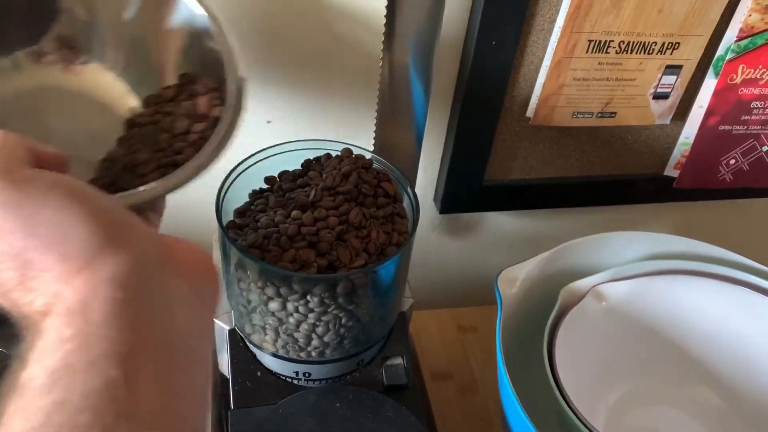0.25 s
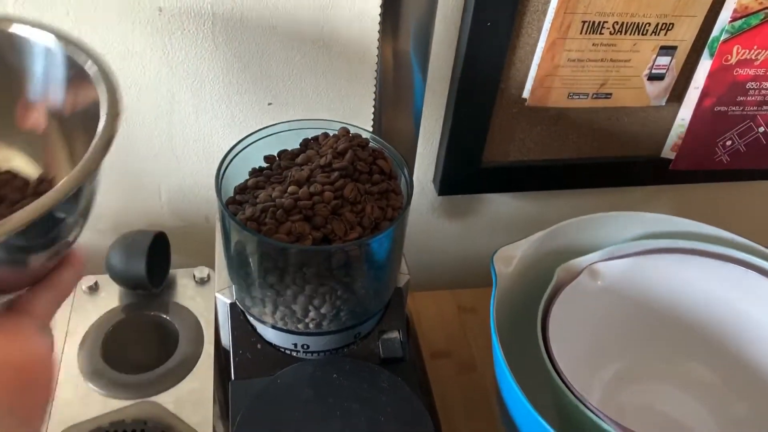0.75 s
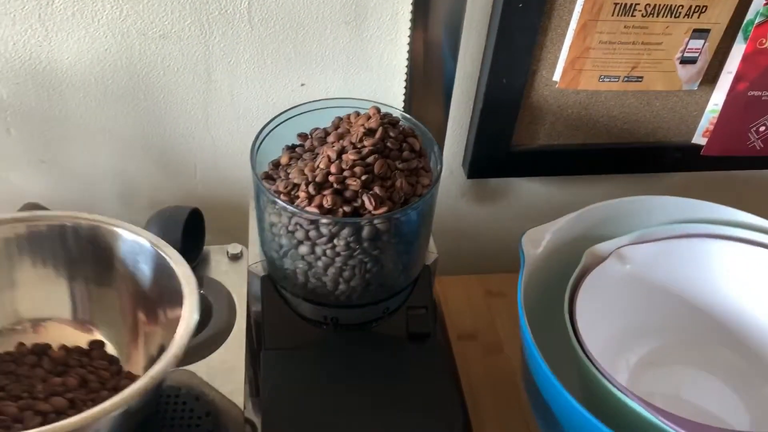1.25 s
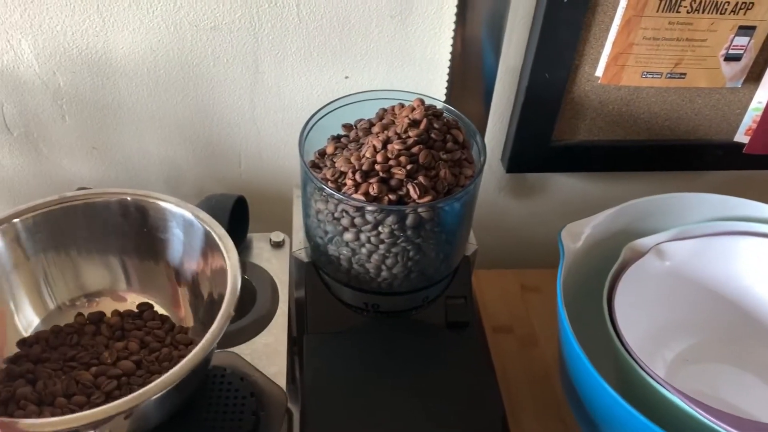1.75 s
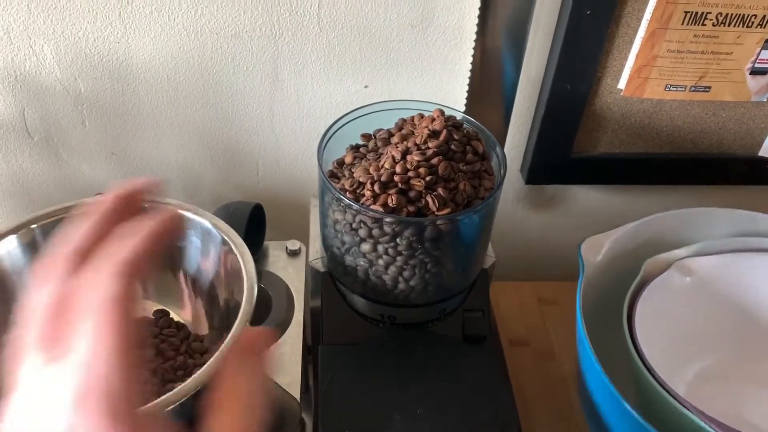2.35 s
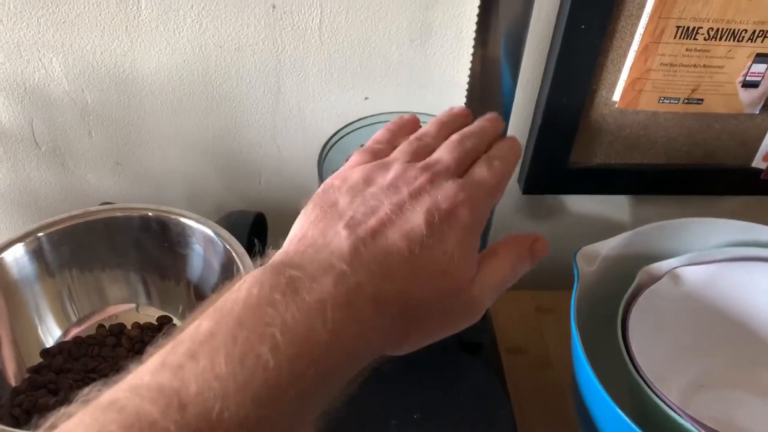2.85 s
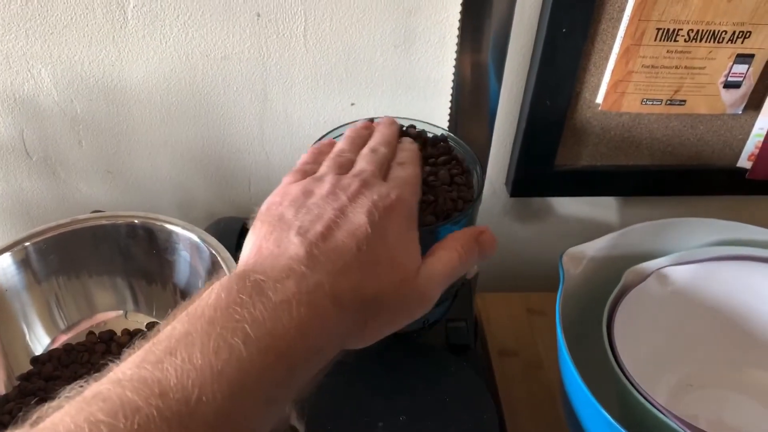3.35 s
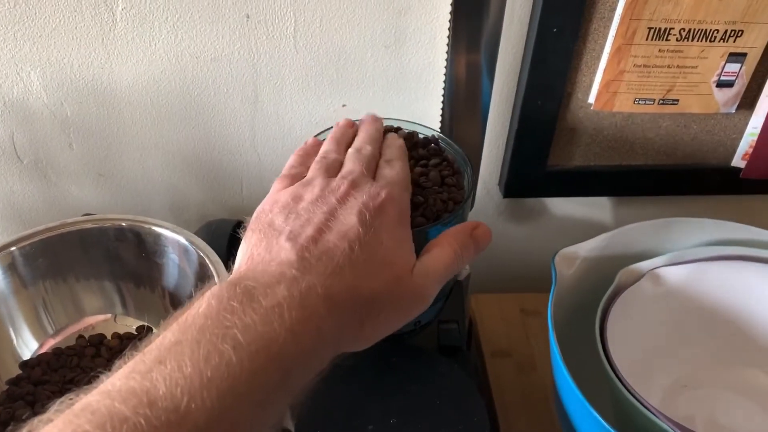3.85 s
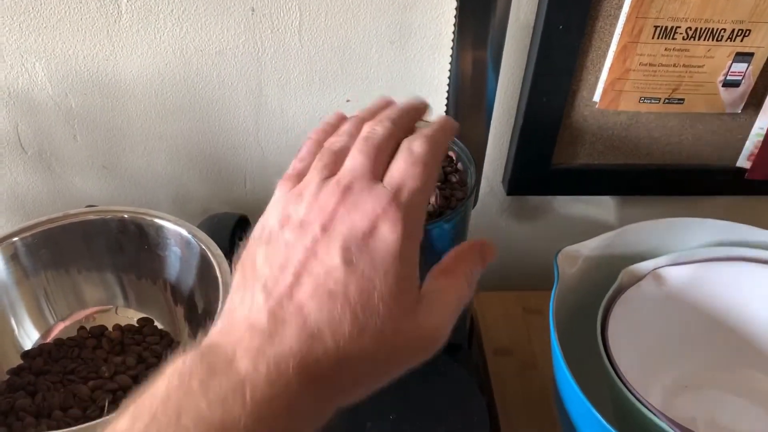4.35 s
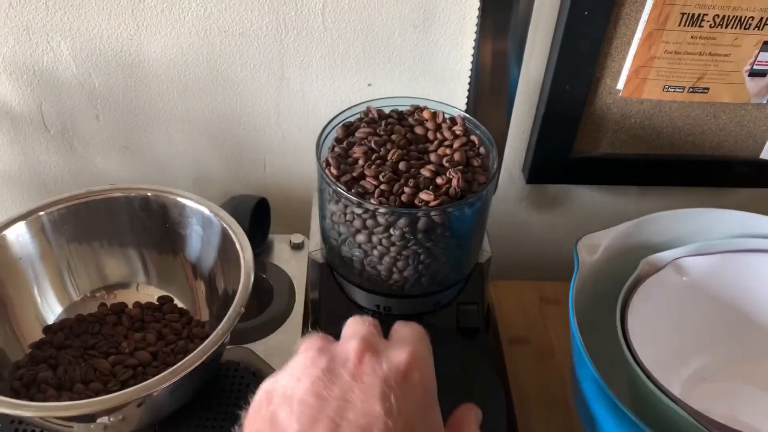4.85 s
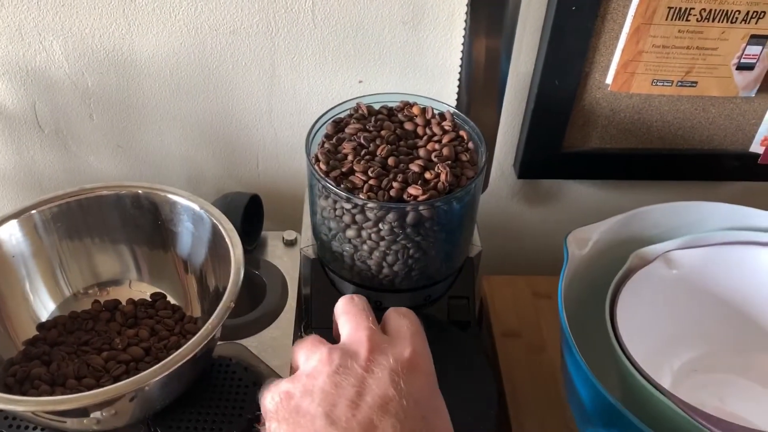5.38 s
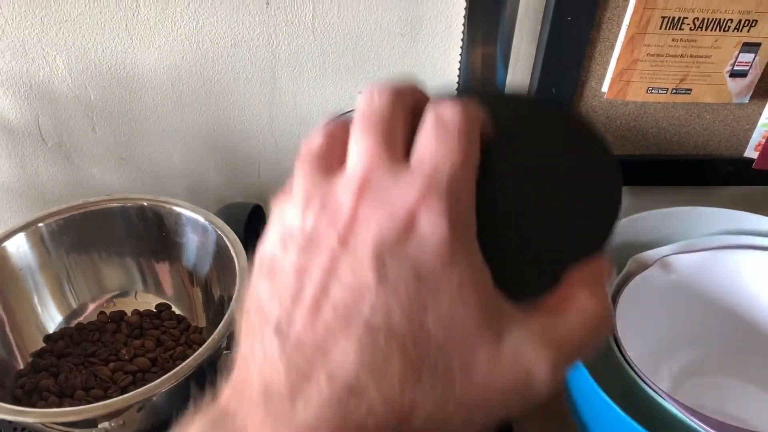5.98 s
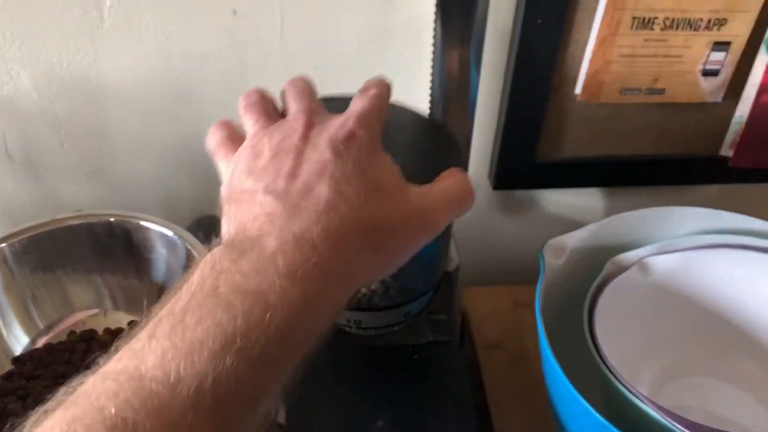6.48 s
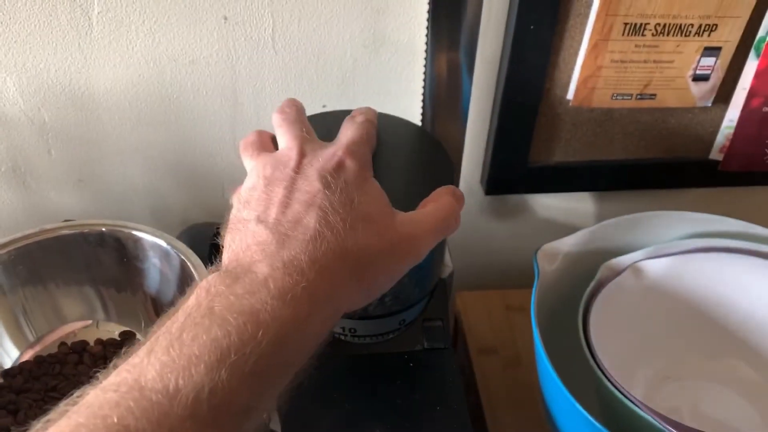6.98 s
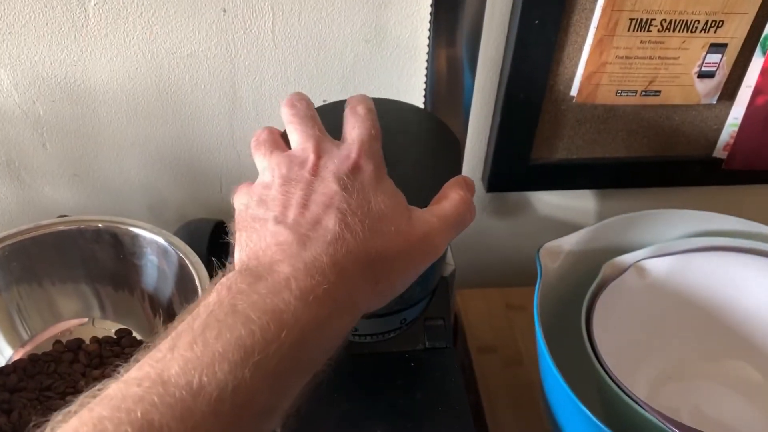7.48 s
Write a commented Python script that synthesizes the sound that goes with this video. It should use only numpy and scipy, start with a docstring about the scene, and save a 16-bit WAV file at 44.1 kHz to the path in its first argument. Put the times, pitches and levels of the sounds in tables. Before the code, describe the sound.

A brief, bright rush of hard coffee beans falls into a grinder hopper, with a faint ring from the steel bowl. The bowl is put down with a muted metallic clunk. Later, beans grind and tick under a hand, then a plastic lid is picked up, catches, clacks and is pressed firmly shut. Soft low thuds recur beneath. Close stereo microphones, short indoor reflections, quiet low room noise.

```python
"""A small kitchen: coffee beans slide from a steel bowl into a plastic grinder hopper, heard close by in stereo.
The beans are showers of tiny noisy contacts; bowl, lid and hopper are struck sets of decaying modes.
The bowl is set down, a hand levels the heap, and the lid is picked up, seated and pressed shut.
Dull thuds, like slow steps elsewhere in the house, come through the floor over a low room noise.
Short reflections surround the counter, and two microphone ports hear it with their own delay and detail."""
import sys
import numpy as np
from scipy import signal
from scipy.fft import rfft, irfft, next_fast_len
from scipy.io import wavfile

SR = 44100
rng = np.random.default_rng(int(sys.argv[2]) if len(sys.argv) > 2 else 0)


def wav_record(signal):
    """Record a signal, one row per channel, as 16-bit PCM in the file named by sys.argv[1]."""
    frames = np.transpose(np.atleast_2d(signal))
    bounded = np.clip(frames, -1, 1)
    # unit amplitude maps onto the largest positive 16-bit level
    quanta = np.round(bounded * 32767).astype(np.int16)
    wavfile.write(sys.argv[1], SR, quanta)


N = 340447
TIME = np.arange(N) / SR

# Levels in the tables are relative: gains, filters and the room still follow.

# Beans sliding over the steel, breaking loose and then running.
# Each row: crest in seconds, level in dB, swell in seconds, fade in seconds.
SLIDE_SURGES = [(.15, -72, .12, .1), (.195, -64.5, 0.02, .06), (.223, -50.5, 0.0087, 0.033),
                (.275, -51.5, .06, .09), (.385, -42.5, 0.11, 0.19)]
# Beans falling on the heap, the end of one tip and then the next.
# Each row: crest in seconds, level in dB, swell in seconds, fade in seconds.
FALL_SURGES = [(.005, -55, .02, .06), (.435, -35, .19, .14)]
# Single beans landing in the hopper. Each row: start in seconds, level in dB, shell pitch in Hz.
BEAN_DROPS = [(0.0064, -37.5, 4440), (0.026, -40, 13900), (0.073, -54, 9950), (0.163, -37.5, 8160),
              (0.217, -33, 3250), (0.2224, -37.5, 10200), (0.2618, -38, 7510), (0.2957, -26.5, 8190),
              (0.3476, -35, 9890), (0.3883, -22, 10100), (0.3945, -22, 3120), (0.408, -23, 13300),
              (0.4154, -23.5, 10000), (0.4377, -25, 10100), (0.4596, -23, 13300), (0.4674, -28, 10100),
              (0.4848, -22, 14000), (0.5015, -31, 10500), (0.5556, -34, 10700), (0.5645, -31, 10600),
              (0.5806, -40, 10800), (0.8895, -55.5, 10100), (0.9698, -46.5, 3460)]
# Spectrum of beans sliding over steel. Each row: frequency in Hz, gain in dB.
SLIDE_SPECTRUM = [(200, -36.5), (550, -27), (800, -11.5), (1250, -13.5), (2000, -9.5), (2700, -13),
                  (3200, 4.5), (3900, -1), (7200, 0.5), (8150, 5.5), (8900, -3), (16000, -7.5)]
# Spectrum of beans falling into the hopper. Each row: frequency in Hz, gain in dB.
FALL_SPECTRUM = [(200, -41), (520, -19.5), (800, -5.5), (1300, -11), (2000, -4.5), (4200, -1.5), (7200, 3),
                 (8200, 7), (9000, -2.5), (10200, 7.5), (12000, 3.5), (13500, 8), (16000, -5.5)]
# The bowl's wall singing under moving beans. Each row: frequency in Hz, level in dB, 60 dB decay in seconds.
BOWL_WALL_MODES = [(700, 1, .1), (831, 3, .11), (1210, 3, .06), (1690, 2, .04), (3100, -8, .035),
                   (3200, -5, .04), (3310, -4, .035), (3615, -5, .05), (4420, -5, .05), (8127, -6, .06),
                   (8220, -7, .05), (10055, 3, .09), (10560, -3, .06), (11230, -4, .06), (13280, -2, .06),
                   (13775, -3, .06)]


def pour(slide_db=7, stream_db=-4, drops_db=3.5, scrape_ring_db=-9, fall_ring_db=-25):
    """Beans slide over the steel and rain on the heap; the bowl's thin wall sings most while they run over it."""
    contacts = grains(SLIDE_SURGES, per_s=650, spread_db=2.2, chatter_t60=.004)
    sliding = amp(slide_db) * colour(contacts, SLIDE_SPECTRUM)
    stream = grains(FALL_SURGES, per_s=300, spread_db=2.5, chatter_t60=.012)
    drops = clicks(BEAN_DROPS, t60=.028, rebound=1.2)
    falling = amp(stream_db) * stream + amp(drops_db) * drops
    wall = ringing(amp(scrape_ring_db) * sliding + amp(fall_ring_db) * falling, BOWL_WALL_MODES)
    return sliding + colour(falling, FALL_SPECTRUM) + wall


# Beans shifting under the hand, then under the lid.
# Each row: crest in seconds, level in dB, swell in seconds, fade in seconds.
STIR_SURGES = [(2.918, -64.5, 0.039, 0.17), (3.225, -54.5, 0.16, 0.22), (3.275, -40.5, 0.048, 0.18),
               (3.525, -67.5, 0.037, 0.046), (3.685, -64, 0.049, 0.046), (3.765, -74, 0.057, 0.11),
               (3.932, -64.5, 0.034, 0.041), (6.71, -57.5, 0.032, 0.2), (6.764, -46.5, 0.028, 0.026),
               (7.315, -63, 0.081, 0.039)]
# Beans snapping past each other in the heap. Each row: start in seconds, level in dB, shell pitch in Hz.
BEAN_SLIPS = [(3.084, -57, 9000), (3.1112, -44, 12200), (3.1482, -36, 9600), (3.222, -50, 13800),
              (3.2605, -35, 9500), (3.2636, -21, 9660), (3.2844, -30, 9420), (3.3255, -25, 14100),
              (3.339, -48, 7100), (3.3812, -34, 5280), (3.4075, -31.5, 10700), (3.510, -52.5, 6000),
              (3.689, -32, 13500), (3.7682, -44, 5310), (3.813, -60, 12500), (3.929, -51, 5530),
              (6.7535, -36, 7100), (6.763, -33, 7900), (7.009, -50.5, 7130), (7.2325, -60, 6180),
              (7.285, -48, 6460), (7.307, -44, 7300), (7.331, -47, 6370)]
# Spectrum of beans moving in the heap. Each row: frequency in Hz, gain in dB.
HEAP_SPECTRUM = [(200, -59), (800, -14), (1500, -8.5), (2700, -10.5), (3900, -1.5), (4800, -1), (5800, 2),
                 (7200, 1), (9500, -2.5), (10500, -1), (12000, -4), (13500, -0.5), (16000, -13)]


def heap(stir_db=-1, slips_db=4.0):
    """Pressed beans grind against each other and now and then slip."""
    beans = grains(STIR_SURGES, per_s=520, spread_db=4, chatter_t60=.006)
    slips = clicks(BEAN_SLIPS, t60=.022, rebound=1.1)
    return colour(amp(stir_db) * beans + amp(slips_db) * slips, HEAP_SPECTRUM)


# The palm dragging over the heap.
# Each row: crest in seconds, level in dB, swell in seconds, fade in seconds.
PALM_SURGES = [(2.925, -68.5, 0.06, 0.22), (3.19, -64.5, 0.23, 0.32), (3.69, -63.5, 0.063, 0.045)]
# Spectrum of beans under the palm. Each row: frequency in Hz, gain in dB.
PALM_SPECTRUM = [(200, -10.5), (700, 1), (1300, 4.5), (2300, 8), (3500, 1), (6000, 1), (16000, -15)]


def palm():
    """The palm drags over the top of the heap with a dull crunch of bean contacts."""
    crunch = grains(PALM_SURGES, per_s=350, spread_db=4, chatter_t60=.008)
    return colour(crunch, PALM_SPECTRUM)


# The bowl rocking onto its base.
# Each row: start in seconds, thump in dB, thump pitch in Hz, ring in dB, crack in dB.
BOWL_BLOWS = [(1.2273, -26, 415, -29.5, -21.5), (1.267, -32.5, 390, -30.5, -31),
              (1.3889, -28.5, 369, -35, -36.5)]
# What the struck steel bowl rings with. Each row: frequency in Hz, level in dB, 60 dB decay in seconds.
BOWL_RING = [(155, -6, .2), (208, -6, .2), (279, -4, .14), (364, 6, .16), (464, -3, .06), (562, 10, .035),
             (633, 14, .06), (756, 12, .055), (834, 12, .055), (953, 3, .04), (1300, -6, .04),
             (1680, 0, .07), (2290, -2, .04), (3600, -2, .04), (4209, 0, .08), (4426, 4, .05),
             (5100, -1, .05)]


def bowl():
    """The steel bowl is set down: every landing is a double blow, and the body then settles more softly."""
    pattern = [(0, 0), (0.0081, 2.5), (0.033, -12.5)]  # delay in seconds, change in dB
    blows = []
    for s, thump, hz, ring, crack in BOWL_BLOWS:
        for late, db in pattern:
            blows.append((s + late, thump + db, hz, ring + db, crack + db))
    return knocks(blows, BOWL_RING, thump_t60=0.02, crack_t60=0.023, crack_rise_s=0.009,
                  thump_db=0.0, ring_db=-1.0, crack_db=-0.5,
                  clatter=1.1, hollow=0.44, brighten=0.44, clunk=0.77)


# The lid bumped while it is handled, and rebounding once it is pushed home.
# Each row: start in seconds, thump in dB, thump pitch in Hz, ring in dB, crack in dB.
LID_BLOWS = [(4.978, -41, 232, -32, -49), (5.249, -52.5, 190, -46.5, -70), (5.261, -45, 240, -49, -72),
             (5.409, -54, 453, -50, -72), (6.468, -59, 433, -69.5, -40), (6.7535, -39.5, 173, -45.5, -38),
             (7.043, -56, 413, -43, -73), (7.076, -40.5, 183, -52, -78), (7.232, -39, 170, -61, -55.5),
             (7.350, -43, 360, -61, -60), (7.465, -35.5, 270, -45, -57), (6.4975, -43.5, 445, -27, -38.5),
             (6.5055, -30.5, 442, -38.5, -39.5), (7.4875, -35, 293.1, -33, -31.5),
             (7.5015, -38, 297.4, -39, -38), (7.513, -38.5, 448, -41, -58.5),
             (7.524, -47, 320, -48.5, -50.5)]
# The lid pushed home. Each row: landing in seconds, thump in dB, thump pitch in Hz, ring in dB, crack in dB,
# time since the rim first caught in seconds, catch in dB.
LID_LANDINGS = [(6.4921, -52.5, 447, -20.5, -34, 0.014, -26), (6.9024, -31, 412, -40, -28.5, .018, -26),
                (7.4931, -24, 288.7, -22.5, -18.5, .0135, -22.5)]
# What the plastic lid rings with. Each row: frequency in Hz, level in dB, 60 dB decay in seconds.
LID_RING = [(143, -9, .1), (210, -10, .15), (298, -2, .14), (375, -5, .12), (431, 0, .15), (591, -5, .06),
            (731, 0, .11), (853, -5, .09), (1010, 0, .035), (1150, 0, .035), (1420, -3, .045),
            (1575, -5, .04), (1730, -8, .035), (2213, -13, .03), (2832, -21, .04), (4510, -19, .025)]
# Spectrum of the rim catching and grating. Each row: frequency in Hz, gain in dB.
GRATE_SPECTRUM = [(200, -7), (1000, -2), (2700, -14.5), (4000, -6.5), (7000, 4), (10000, -8), (13500, 0.5),
                  (16000, -16)]


def lid(catch_db=5, catch_hz=11500, grate_db=-16, grate_swell_s=0.026, grate_fade_s=0.021,
        slip_lead=0.34, slip_body_db=-6.5, slip_crack_db=2):
    """The plastic lid is bumped about and pushed home: its rim catches, grates, slips and lands."""
    blows, catches, grating = list(LID_BLOWS), [], []
    for s, thump, hz, ring, crack, lead, catch in LID_LANDINGS:
        slip = s - lead * slip_lead  # the rim slips once between catching and landing
        catches.append((s - lead, catch + catch_db, catch_hz))
        grating.append((slip, catch + grate_db, grate_swell_s, grate_fade_s))
        blows.append((slip, thump + slip_body_db, hz, ring + slip_body_db, catch + slip_crack_db))
        blows.append((s, thump, hz, ring, crack))
    rim = clicks(catches, t60=.02, rebound=1.5)
    rim = rim + grains(grating, per_s=1500, spread_db=3, chatter_t60=.004)
    body = knocks(blows, LID_RING, thump_t60=.05, crack_t60=.028, crack_rise_s=.0003,
                  thump_db=-2, ring_db=-3.5, crack_db=0,
                  clatter=.9, hollow=.3, brighten=.3, clunk=.4)
    return body + colour(rim, GRATE_SPECTRUM)


# The lid dragging as it is gripped and lifted.
# Each row: crest in seconds, level in dB, swell in seconds, fade in seconds.
SCUFF_SURGES = [(4.975, -57, 0.06, 0.079), (5.262, -71, .035, .06), (5.412, -76, 0.02, 0.05)]
# Spectrum of the dragging lid. Each row: frequency in Hz, gain in dB.
SCUFF_SPECTRUM = [(150, 1), (600, 21.5), (1100, 6), (1800, 15), (2800, 0.5), (4500, -9.5), (8500, 0),
                  (12000, -10), (16000, -4)]
# The lid rubbing on the rim as it is turned.
# Each row: crest in seconds, level in dB, swell in seconds, fade in seconds.
RUB_SURGES = [(7.075, -72, 0.025, 0.4), (7.32, -59, 0.1, 0.047)]
# Spectrum of the lid rubbing on the rim. Each row: frequency in Hz, gain in dB.
RUB_SPECTRUM = [(150, 0), (500, 18.5), (1100, 2), (2400, 7.5), (3000, -1), (4500, -2.5), (7000, -8.5),
                (16000, -24)]


def lid_scuff(scuff_db=-2):
    """The lid drags briefly as it is gripped, and later rubs on the rim as it is turned into its seat."""
    scuff = grains(SCUFF_SURGES, per_s=3400, spread_db=2, chatter_t60=.004)
    rub = grains(RUB_SURGES, per_s=400, spread_db=3.5, chatter_t60=.01)
    return amp(scuff_db) * colour(scuff, SCUFF_SPECTRUM) + colour(rub, RUB_SPECTRUM)


# Beans and lid ticking against the hopper's wall.
# Each row: start in seconds, level in dB, favoured pitch in Hz, spread in octaves.
HOPPER_TICKS = [(3.264, -24, 9420, .2), (3.267, -42, 4001, .06), (5.408, -63.5, 3300, 0.099),
                (6.492, -53, 3800, .5), (6.902, -25.5, 8000, 0.64), (7.044, -50, 1600, 0.5),
                (7.191, -59.5, 4300, 0.4), (7.234, -59, 4540, 0.19), (7.4945, -21, 3400, 1.17)]
# What the hopper's wall rings with. Each row: frequency in Hz, level in dB, 60 dB decay in seconds.
HOPPER_RING = [(1256, -3, .035), (1420, -2, .04), (1535, -2, .03), (2499, 1, .038), (3144, -4, .025),
               (3320, -5, .028), (3600, 0, .026), (3760, -1, .024), (4001, -17, .07), (4580, 0, .024),
               (6228, -2, .02), (7057, -1, .02), (7546, -2, .02), (9420, -2, .026), (9819, -1, .024),
               (13330, 0, .02)]


def hopper():
    """Hard contacts ring the hopper's wall; the place of contact favours the modes around one pitch."""
    out, t = np.zeros(N), TIME[:SR // 4]
    hz, db, t60 = np.transpose(HOPPER_RING)[:, :, None]
    waves = amp(db - 60 * t / t60) * np.sin(2 * np.pi * hz * t)
    for s, level, centre_hz, octaves in HOPPER_TICKS:
        favour = np.exp(-(np.log2(hz / centre_hz) / octaves) ** 2) * rng.choice([-1, 1], hz.shape)
        add(out, s, amp(level) * peaked((favour * waves).sum(0)))
    return out


# The hand pressing on the plastic.
# Each row: crest in seconds, level in dB, swell in seconds, fade in seconds, hum in Hz.
HAND_PRESSES = [(5.708, -40, 0.02, 0.024, 211.7), (6.505, -44, 0.016, 0.05, 209),
                (6.909, -32.5, 0.012, 0.016, 389), (6.915, -42, .02, .05, 265),
                (7.239, -43.5, 0.0052, 0.022, 388), (7.496, -23.5, 0.013, 0.017, 297),
                (7.502, -30, 0.016, 0.028, 143)]


def presses():
    """Under the soft weight of the hand the plastic flexes and hums for a few cycles."""
    out = np.zeros(N)
    for crest, db, swell, fade, hz in HAND_PRESSES:
        out += surges([(crest, db, swell, fade)]) * np.sin(2 * np.pi * hz * (TIME - crest))
    return out


# Thuds through the floor. Each row: start in seconds, boom in dB, knock in dB.
FLOOR_THUDS = [(0.0, -41.5, -78), (1.079, -69, -50.5), (1.157, -26, -47.5), (1.931, -34, -51),
               (2.196, -27, -40.5), (3.068, -26.5, -39.5), (4.205, -31, -49), (5.232, -30.5, -45.5),
               (6.202, -32.5, -50.5), (6.737, -41.5, -46), (7.077, -41, -47)]
# Spectrum of the diffuse part of the boom. Each row: frequency in Hz, gain in dB.
BOOM_SPECTRUM = [(24, -43.5), (38, -18), (52, -3), (68, -4.5), (85, -12), (120, -25), (300, -71),
                 (16000, -130)]
# Spectrum of the knock on the boards. Each row: frequency in Hz, gain in dB.
KNOCK_SPECTRUM = [(60, -18.5), (115, -5), (150, 2), (200, -1.5), (280, -10.5), (400, -22.5), (800, -37.5),
                  (2000, -75.5), (16000, -120)]


def thuds(boom_db=-1, knock_db=7, boom_t60=0.28, knock_t60=0.41, boom_hz=66, diffuse=0.5):
    """Each thud knocks on the boards and leaves the room's lowest resonance booming."""
    out, t = np.zeros(N), TIME[:SR // 2]
    pattern = [(0, 0), (0.11, -9.5)]  # like heel and softer toe: delay in seconds, change in dB
    for s, boom, knock in FLOOR_THUDS:
        for late, db in pattern:
            mode = np.sin(2 * np.pi * boom_hz * rng.uniform(0.84, 1.2) * t)
            mode *= amp(-60 * t / boom_t60) * (1 - np.exp(-t / 0.0052))
            rumble = peaked(colour(burst(boom_t60, 0.036), BOOM_SPECTRUM))
            boards = peaked(colour(burst(knock_t60, 0.01), KNOCK_SPECTRUM))
            add(out, s + late, amp(boom + boom_db + db) * (mode + diffuse * rumble))
            add(out, s + late, amp(knock + knock_db + db) * boards)
    return out


# Spectrum of the room noise. Each row: frequency in Hz, gain in dB.
ROOM_SPECTRUM = [(24, -42), (37, -7.5), (62, 2.5), (95, -6), (140, -6.5), (190, -3), (310, -16.5),
                 (370, -9), (500, -21.5), (1030, -29.5), (1500, -41), (3000, -47.5), (8000, -54),
                 (15000, -58)]


def room_noise(level_db=-54.5, waver_db=1.14):
    """A low, slowly wavering rumble with a trace of hiss, from filtered noise."""
    noise = unit(colour(rng.standard_normal(N), ROOM_SPECTRUM, size=16384))
    waver = np.interp(TIME, np.linspace(0, TIME[-1], num=24), rng.standard_normal(24))
    return amp(level_db + waver_db * waver) * noise


def bean_contact(chatter_t60, hollow=0.62):
    """One bean striking another: a brief chatter and the ring of its own hollow shell."""
    t = TIME[:512]
    shell = np.sin(2 * np.pi * rng.uniform(3000, 14000) * t) * amp(-60 * t / chatter_t60)
    return peaked(peaked(burst(chatter_t60, .00005, size=512)) + hollow * shell)


def grains(rows, per_s, spread_db, chatter_t60):
    """Countless contacts of uneven force; their level follows the surges."""
    flow = surges(rows)
    force = amp(spread_db * np.minimum(rng.exponential(1, N), 3.5))
    force = force * (rng.random(N) < per_s / SR) * (flow > 0)
    kinds = np.array([bean_contact(chatter_t60) for _ in range(64)])
    kind = rng.integers(0, len(kinds), N)
    # lay a randomly chosen contact at every struck sample and sum the overlaps
    at = np.flatnonzero(force)
    places = at[:, None] + np.arange(kinds.shape[1])
    struck = force[at, None] * kinds[kind[at]]
    rattle = np.bincount(places.ravel(), struck.ravel(), N)[:N]
    return rattle / rattle[flow > 0].std() * flow


def surges(rows, drop_db=35.5, curve=2.04):
    """Gain of movements that swell to a crest and fade, drop_db lower one swell before and one fade after."""
    gain = np.zeros(N)
    for crest, db, swell, fade in rows:
        away = np.maximum((crest - TIME) / swell, (TIME - crest) / fade)
        near = away < 2
        gain[near] += amp(db - drop_db * away[near] ** curve)
    return gain


def clicks(rows, t60, rebound, shell_db=-2, shell_t60=.026, shell_octaves=.2):
    """Single hard contacts: a sharp tick, a longer chatter, and shell modes around the given pitch."""
    out, t = np.zeros(N), TIME[:4096]
    for s, db, hz in rows:
        modes = hz * 2 ** (shell_octaves * rng.uniform(-0.69, 1, (4, 1)))
        shell = unit(np.sin(2 * np.pi * modes * t).sum(0) * amp(-60 * t / shell_t60))
        tick = unit(burst(0.0018, .0001, size=4096))
        chatter = unit(burst(t60, 0.0016, size=4096))  # jolted neighbours
        add(out, s, amp(db) * peaked(tick + rebound * (chatter + amp(shell_db) * shell)))
    return out


def ringing(x, modes, place_db=4.0, places_per_s=70):
    """A thin wall sings when x shakes it; the moving place of contact keeps changing each mode's share."""
    out, moments = np.zeros(N), np.arange(0, N / SR, 1 / places_per_s)
    for hz, db, t60 in modes:
        wander = np.interp(TIME, moments, rng.standard_normal(len(moments)))
        place = unit(amp(place_db * wander))
        # a two-pole resonator: the pole radius r sets the decay
        r, angle = amp(-60 / (t60 * SR)), 2 * np.pi * hz / SR
        poles = [1, -2 * r * np.cos(angle), r * r]
        sung = signal.lfilter([0, np.sin(angle)], poles, x * place + 1e-20)
        out += amp(db) * np.sqrt(1 - r * r) * sung
    return out


# Dense, dull answer of the support under a blow. Each row: frequency in Hz, gain in dB.
CLUNK_SPECTRUM = [(60, -13), (140, -1.5), (280, 0), (370, -1.5), (460, -2), (600, -6.5), (850, -15),
                  (1300, -21.5), (4000, -46)]
# Loose rattle after a blow. Each row: frequency in Hz, gain in dB before brightening.
CLATTER_SPECTRUM = [(200, -14.5), (500, -8), (1100, -11), (1700, -11), (3000, -13), (8000, -32.5)]
# Crack at the point of contact. Each row: frequency in Hz, gain in dB.
CRACK_SPECTRUM = [(100, -15), (500, -2.5), (1400, -19), (2200, -10), (4200, 1), (6000, 4), (8500, 4.5),
                  (10500, 4.5), (12000, -2), (13300, 5), (15000, -10), (16000, -12.5)]


def knocks(rows, modes, thump_t60, crack_t60, crack_rise_s, thump_db, ring_db, crack_db,
           clatter, hollow, brighten, clunk):
    """Each blow pushes the body (thump, low modes, clunk), rings its wall (high modes) and cracks."""
    out, t = np.zeros(N), TIME[:SR // 3]
    hz, db, t60 = np.transpose(modes)[:, :, None]
    low = hz[:, 0] < 490
    for s, thump, thump_hz, ring, crack in rows:
        # the place of the blow decides how strongly each mode answers
        place = rng.choice([-1, 1], hz.shape) * amp(2.5 * rng.standard_normal(hz.shape))
        waves = place * amp(db - 60 * t / t60) * np.sin(2 * np.pi * hz * t)
        # a harder contact favours the high modes
        db_per_octave = np.clip(brighten * (crack - ring), -6, 6)
        bright_waves = waves * amp(db_per_octave * np.log2(hz))

        support = peaked(colour(burst(0.13, 0.0015, size=len(t)), CLUNK_SPECTRUM))
        body = np.sin(2 * np.pi * thump_hz * t) * amp(-60 * t / thump_t60)
        body = body + hollow * peaked(waves[low].sum(0)) + clunk * support

        bright_clatter = [(f, level + db_per_octave * np.log2(f)) for f, level in CLATTER_SPECTRUM]
        rattle = colour(burst(0.077, 0.00021, size=len(t)), bright_clatter)
        wall = peaked(bright_waves[~low].sum(0)) + clatter * peaked(rattle)

        contact = peaked(colour(burst(crack_t60, crack_rise_s, size=len(t)), CRACK_SPECTRUM))
        blow = amp(thump + thump_db) * body + amp(ring + ring_db) * wall
        add(out, s, blow + amp(crack + crack_db) * contact)
    return out


def burst(t60, rise, size=SR // 2):
    """Noise that swells briefly and dies away."""
    t = TIME[:size]
    return rng.standard_normal(size) * amp(-60 * t / t60) * (1 - np.exp(-t / rise))


def colour(x, points, size=4096):
    """Causal filter with the given spectrum."""
    log_gain = np.log(amp(read(points, abs(np.fft.fftfreq(size, 1 / SR)))))
    # minimum phase: the Hilbert transform of the log gain gives the phase
    taps = np.fft.ifft(np.exp(np.conj(signal.hilbert(log_gain)))).real
    return signal.oaconvolve(x, taps)[:len(x)]


def read(points, hz):
    """Reads a table on a log-frequency axis."""
    f, value = np.transpose(points)
    return np.interp(np.log(hz + 1), np.log(f + 1), value)


def add(mix, s, sound):
    """Mixes a sound in at s seconds."""
    part = mix[max(round(s * SR), 0):][:len(sound)]
    part += sound[:len(part)]


def amp(db):
    """Decibels to gain."""
    return 10 ** (np.asarray(db) / 20)


def unit(x):
    """Scales to rms 1."""
    return x / np.sqrt(np.mean(x ** 2) + 1e-20)


def peaked(x):
    """Scales to peak 1."""
    return x / (abs(x).max() + 1e-20)


# The kitchen's decay. Each row: frequency in Hz, 60 dB decay in seconds.
KITCHEN_DECAY = [(100, .28), (400, .13), (1500, .25), (5000, .255), (10000, .225), (16000, .14)]


def kitchen(x, near_db=-12, tail_db=-11):
    """The direct sound, quick reflections off counter and wall, then a short tail."""
    hz, t, z = signal.stft(rng.standard_normal(SR // 2), SR, nperseg=256)
    fading = z * amp(-60 * t / read(KITCHEN_DECAY, hz)[:, None])
    tail = signal.istft(fading, SR, nperseg=256)[1][:SR // 2]
    tail *= 1 - np.exp(-TIME[:len(tail)] / 0.0072)
    near = burst(0.059, 0.0011)
    response = amp(near_db) * near / np.linalg.norm(near) + amp(tail_db) * tail / np.linalg.norm(tail)
    return x + signal.oaconvolve(x, response)[:N]


# Phase between the microphone ports. Each row: frequency in Hz, lead of the left in radians.
PORT_LEAD = [(0, 0), (60, .05), (200, .17), (900, .7), (2100, 1.8), (3300, 5.4), (5500, 7), (8000, 10.4),
             (10000, 12.6), (12000, 15.7), (13400, 18.8), (15000, 21)]
# How alike the ports hear. Each row: frequency in Hz, likeness from 0 to 1.
PORT_SHARED = [(60, 1), (150, .96), (300, .85), (640, .68), (1400, .6), (3000, .3), (7000, .35),
               (10000, .7), (12000, .85), (16000, .8)]
# Level between the ports. Each row: frequency in Hz, left minus right in dB.
PORT_LEAN = [(60, -4.2), (150, -.5), (300, -.5), (600, 2.5), (1100, 2), (2200, 0), (16000, 0)]


def ports(front, scattered):
    """Two microphone ports: the right hears the sound later, and partly by other paths."""
    padded = next_fast_len(N, real=True)
    hz = np.fft.rfftfreq(padded, 1 / SR)
    like = np.clip(read(PORT_SHARED, hz), 0, 1)
    lean = amp(read(PORT_LEAN, hz) / 2)
    left = rfft(front, padded)
    right = like * left + np.sqrt(1 - like ** 2) * rfft(scattered, padded)
    right = right * np.exp(-1j * np.interp(hz, *np.transpose(PORT_LEAD)))
    return irfft([left * lean, right / lean], padded)[:, :N]


def one_path():
    """Beans, bowl, hopper and lid in the kitchen, with room noise, as heard from one direction."""
    counter = pour() + heap() + palm() + bowl() + lid_scuff() + lid() + hopper()
    return kitchen(counter) + room_noise()


def scene():
    """The ports hear the counter in different fine detail; thuds and presses have no scattered path."""
    return ports(one_path() + thuds() + kitchen(presses()), one_path())


def record(dry, low_cut_hz=37, edge_hz=15900):
    """A steep cut of the deepest lows and the recorder's upper band limit."""
    low_cut = signal.butter(4, low_cut_hz, "high", fs=SR, output="sos")
    dry = signal.sosfilt(low_cut, dry)
    band_limit = signal.firwin(401, edge_hz, window=("kaiser", 8), fs=SR)
    return signal.oaconvolve(dry, band_limit[None], "same")


dry = scene()
out = record(dry)
wav_record(out)
```